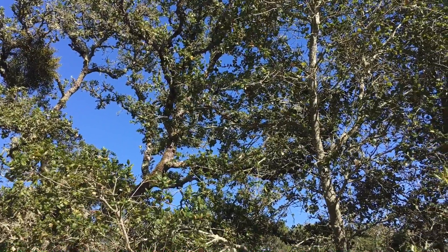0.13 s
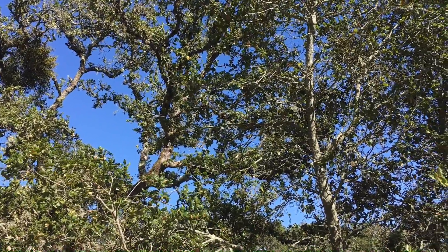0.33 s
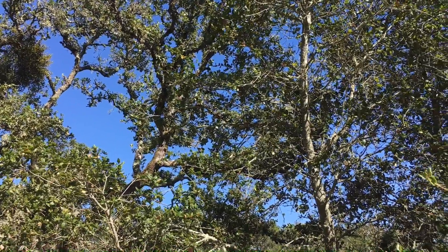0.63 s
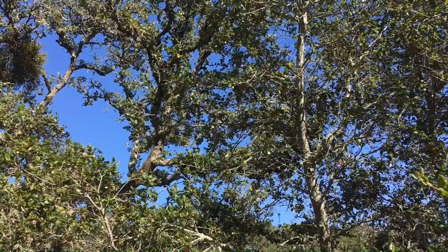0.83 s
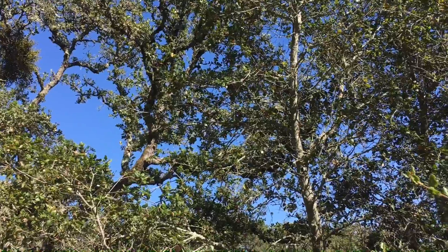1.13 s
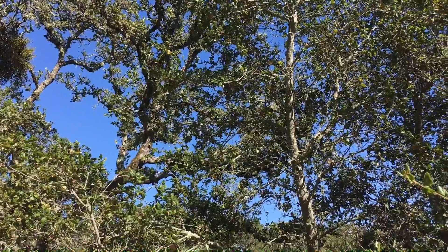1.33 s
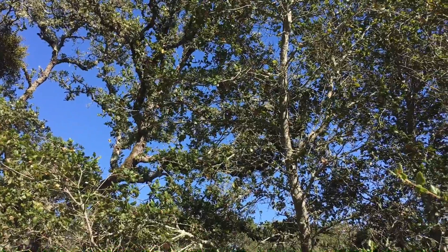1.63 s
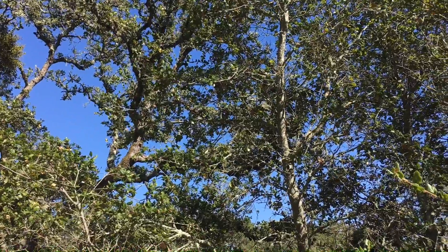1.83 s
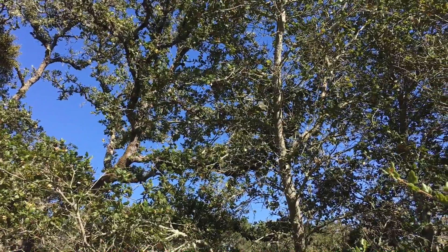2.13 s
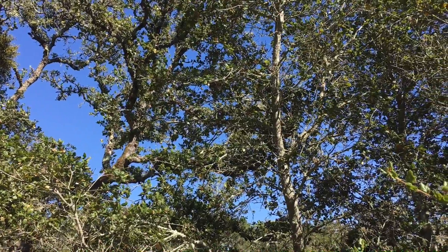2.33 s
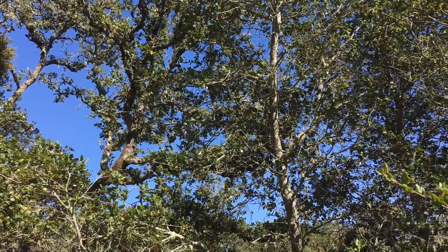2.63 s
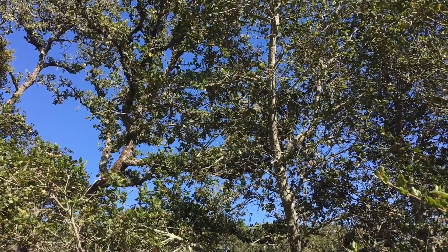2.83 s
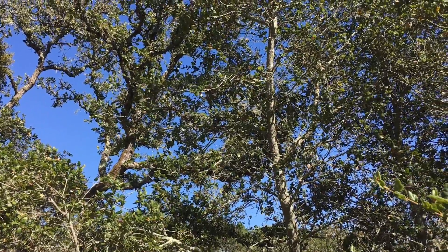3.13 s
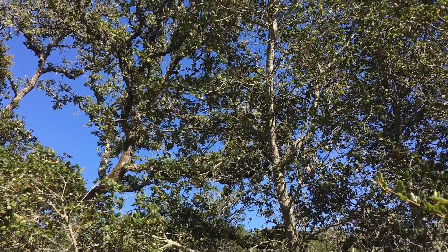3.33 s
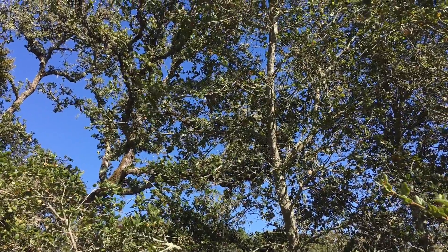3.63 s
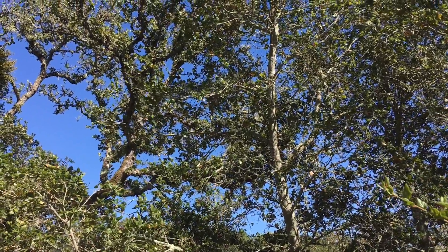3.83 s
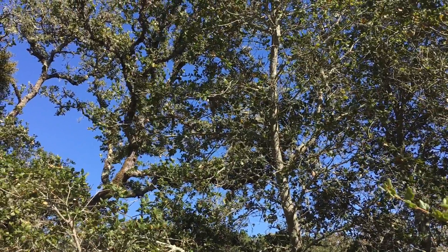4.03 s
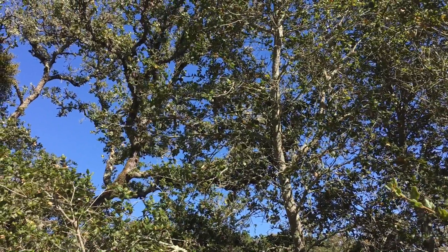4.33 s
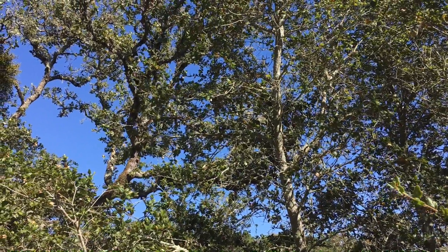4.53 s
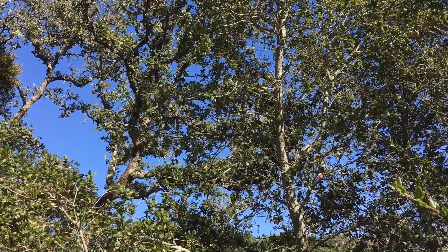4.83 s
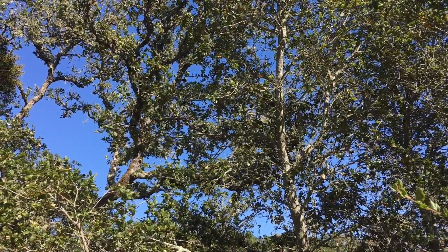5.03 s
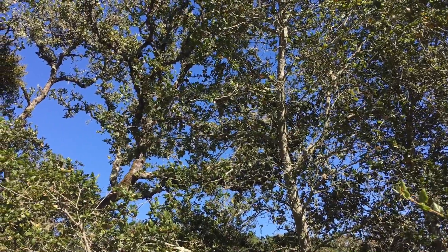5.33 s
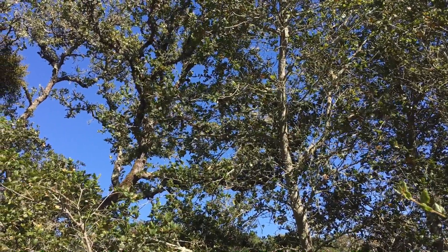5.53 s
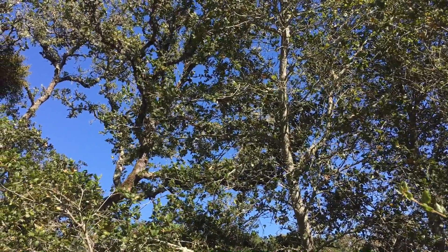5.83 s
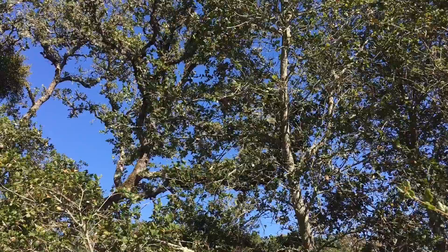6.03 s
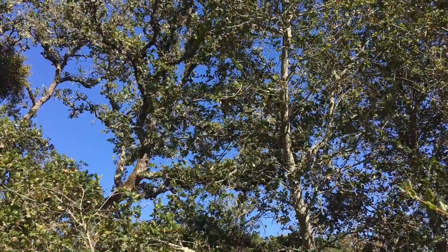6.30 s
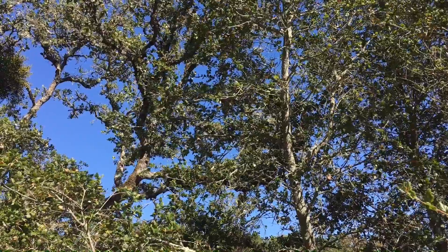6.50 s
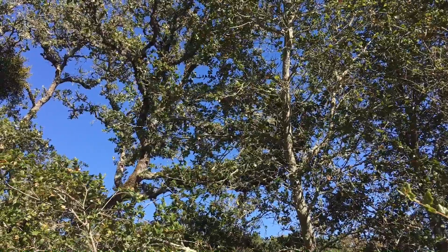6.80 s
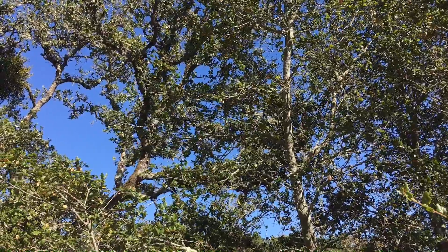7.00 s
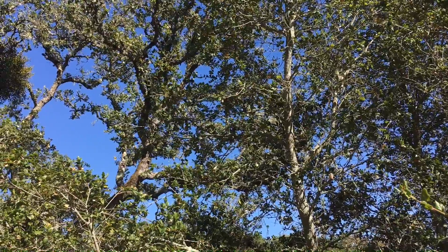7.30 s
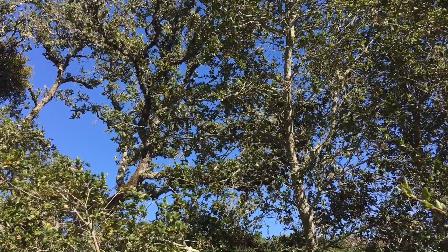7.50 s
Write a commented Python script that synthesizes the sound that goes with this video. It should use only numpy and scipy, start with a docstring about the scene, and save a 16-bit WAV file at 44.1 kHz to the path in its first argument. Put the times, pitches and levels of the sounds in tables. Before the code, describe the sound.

Small finches call softly from tall trees over a faint hiss and distant rumble. A chirp, a nasal note and a rising whine come first, then two plaintive falling whistles and a quick hoarse chatter. Another whine leads into a brief gust that thumps and rumbles on the microphone, and more falling whistles follow. Light wind puffs and a few dry leaf ticks come and go.

```python
"""Small finches call from tall trees: plaintive falling whistles, two-voiced rising whines, quick chatter.
Each note is a vibration of the syrinx, shaped by throat and beak, then scattered by trunks and leaves.
Puffs of wind and one strong gust buffet the microphone, dry leaves tick,
and a faint distant rumble lies under the hiss of the air."""
import sys
import numpy as np
from scipy import signal
from scipy.fft import rfft, irfft, next_fast_len
from scipy.io import wavfile
from scipy.ndimage import uniform_filter1d, map_coordinates

SR = 44100
rng = np.random.default_rng(int(sys.argv[2]) if len(sys.argv) > 2 else 0)


def output_pcm(signal):
    """Save a mono or channel-first signal as 16-bit PCM at the path in sys.argv[1].

    Samples are clipped to [-1, 1] before scaling.
    """
    pcm = np.clip(np.atleast_2d(signal).T, -1, 1) * 32767
    wavfile.write(sys.argv[1], SR, np.round(pcm).astype(np.int16))


N = 337790
T = np.arange(N) / SR

# A nearly pure voice at the syrinx. Each row: harmonic number, level in dB.
PURE_VOICE = [(1, 7.5), (2, -10), (3, -23.5), (4, -30)]
# Falling whistles. Each row: peak time in seconds, peak pitch in Hz, buzz length in seconds, valley
# pitch in Hz, lift length in seconds, crest pitch in Hz, tail length in seconds, tail start and end
# pitch in Hz, tail easing, peak, buzz and tail levels in dB, tail fade in dB, brightness in dB per octave.
FALLING_WHISTLES = [(2.576, 4990, .047, 3620, 0.041, 4000, .45, 3256, 2655, .45, -58, -54.3, -56, -17.5, 0),
                    (3.508, 5086, .064, 3800, .062, 3945, .14, 3860, 3296, 1.08, -54.5, -57, -56, -15, 9.5),
                    (5.802, 5110, .05, 3650, .038, 4060, .39, 3255, 2667, 0.122, -59, -55, -56.5, -12.5, -4),
                    (7.354, 4990, .072, 4060, 0.0083, 3980, .22, 3925, 3250, 0.5, -55.5, -52.5, -48.5, -16.5, 7.5)]


def whistles(lead_s=.04, lead_hz=802, lead_db=-14, warble_hz=463, shiver_hz=60, shiver_s=.068):
    """A soft lead-in climbs to a buzz, dips, lifts, then falls in a long tone that calms and turns reedy."""
    out = np.zeros(N)
    for (s, peak_hz, buzz_s, valley_hz, lift_s, crest_hz, tail_s, from_hz, to_hz, ease,
         peak_db, buzz_db, tail_db, fade_db, bright_db) in FALLING_WHISTLES:
        valley_s = s + buzz_s
        crest_s = valley_s + lift_s
        # breakpoints: time, pitch, level, warble depth
        lead = [(s - lead_s, peak_hz - lead_hz, peak_db + lead_db, 0),
                (s - .3 * lead_s, peak_hz - .202 * lead_hz, peak_db + .51 * lead_db, .3 * warble_hz)]
        buzz = [(s, peak_hz, peak_db, warble_hz),
                (s + .7 * buzz_s, valley_hz + .27 * (peak_hz - valley_hz), buzz_db, warble_hz),
                (valley_s, valley_hz, buzz_db - 10.5, .25 * warble_hz)]
        lift = [(valley_s + lift_s / 2, valley_hz + .3 * (crest_hz - valley_hz), tail_db - 7, 0),
                (crest_s - lift_s / 10, crest_hz, tail_db + 1.5, 0)]
        fall = glide(crest_s, tail_s, from_hz, to_hz, tail_db, ease, attack_s=.0013, release_s=.051,
                     fade_db=fade_db, scoop_hz=crest_hz - from_hz, bend_s=.014)
        tail = [(when, hz, db, shiver_hz * np.exp((crest_s - when) / shiver_s))
                for when, hz, db in fall[1:]]
        course = lead + buzz + lift + tail
        out += notes([course], PURE_VOICE, jitter=.0017, clean_db=-15, ripe=.78, bright_db=bright_db)
    return out


# The two sides of the syrinx in a whine. Each row: harmonic number, level in dB.
LOWER_VOICE = [(1, -3), (2, 2.5), (3, -8), (4, -12)]
UPPER_VOICE = [(1, 1.5), (2, -4), (3, -19)]
# Rising whines. Each row: start and length in seconds, lower voice start and end in Hz,
# upper voice start and end in Hz, level in dB.
RISING_WHINES = [(-.36, .51, 2013, 2725, 2950, 3590, -65.5), (1.42, .495, 2003, 2690, 2898, 3507, -60.5),
                 (5.285, .47, 2048, 2682, 2935, 3543, -60)]


def whines(sum_db=-9, cross_db=-12, closing_db=-9, upper_db=-9):
    """Both sides of the syrinx rise, the lower fading as the upper swells; coupling adds extra tones."""
    out = np.zeros(N)
    for s, length, low_from_hz, low_to_hz, up_from_hz, up_to_hz, db in RISING_WHINES:
        lower = glide(s, length, low_from_hz, low_to_hz, db, ease=-.05, attack_s=.065, release_s=.12,
                      fade_db=-6.5, scoop_hz=-350, bend_s=.013)
        upper = glide(s, length, up_from_hz, up_to_hz, db + upper_db, ease=.58, attack_s=.007,
                      release_s=.16, fade_db=10.5, scoop_hz=-220, bend_s=.0139)
        t = span(lower, upper)
        low_phase, low_hz, low_gain = syrinx(t, lower, jitter=.003)
        up_phase, up_hz, up_gain = syrinx(t, upper, jitter=.0017)
        dull_db = closing_db * np.linspace(0, 1, len(t)) ** 2  # the upper voice ends purer
        low_voice = beak(low_phase, low_hz, low_gain, LOWER_VOICE)
        up_voice = beak(up_phase, up_hz, up_gain, UPPER_VOICE, dull_db)
        sum_gain = undb(sum_db + dull_db) * response(BEAK_RESONANCE, low_hz + up_hz)
        sum_tone = sum_gain * np.sqrt(low_gain * up_gain) * np.sin(low_phase + up_phase)
        cross_tone = undb(cross_db) * up_gain * np.sin(2 * up_phase - low_phase)
        add(out, t, low_voice + up_voice + np.sqrt(2) * (sum_tone + cross_tone))
    return out


# The chatter. Each row: syllable time in seconds, pitch ratio, level in dB.
SYLLABLES = [(4.318, 1.03, -56.5), (4.421, 1.01, -56), (4.523, .99, -57.5), (4.624, 0.99, -58)]
# The three strokes of a syllable. Each row: offset and length in seconds, start and end pitch in Hz
# before the ratio, relative level in dB, easing, fade in dB.
SYLLABLE_STROKES = [(-.013, .032, 4610, 5500, -2, -1.17, -1), (-.002, 0.0476, 3550, 4220, -4.5, 1.3, 0),
                    (.017, .058, 3700, 2422, 3, .15, -14)]


def chatter():
    """Each syllable is a hoarse high flick, a middle flick and a downward slur that trails off low."""
    strokes = []
    for lag, length, from_hz, to_hz, stroke_db, ease, fade_db in SYLLABLE_STROKES:
        strokes.append([glide(s + lag, length, ratio * from_hz, ratio * to_hz, db + stroke_db, ease,
                              attack_s=.011, release_s=.016, fade_db=fade_db)
                        for s, ratio, db in SYLLABLES])
    high, middle, slur = strokes
    flick = rasp(notes(high, PURE_VOICE[:1], jitter=.022), rasp_db=-1, width_hz=1900)
    body = notes(middle + slur, PURE_VOICE, jitter=.01, bright_db=-3.5)
    return undb(-2.5) * flick + rasp(body, rasp_db=-6.5, width_hz=2300)


# Squeaks around the chatter and at the onset of whines.
# Each row: start and length in seconds, start and end pitch in Hz, level in dB.
SQUEAK_GLIDES = [(1.417, 0.035, 6050, 7200, -59), (1.437, 0.041, 4800, 5200, -58),
                 (5.285, 0.031, 6100, 6950, -59), (5.30, 0.036, 4800, 5200, -62),
                 (4.236, 0.078, 5830, 5990, -59.5), (4.257, 0.041, 5230, 5030, -59),
                 (4.236, 0.048, 2950, 3000, -65), (4.508, 0.028, 4680, 4400, -59)]


def squeaks(edge_db=-9):
    """Brief unsteady glides, loudest in the middle; those that climb steeply are the hoarsest."""
    steep, flat = [], []
    for s, length, from_hz, to_hz, db in SQUEAK_GLIDES:
        group = steep if to_hz > 1.06 * from_hz else flat
        group.append([(s, from_hz, db + edge_db),
                      (s + length / 2, (from_hz + to_hz) / 2, db),
                      (s + length, to_hz, db + edge_db)])
    hoarse = rasp(notes(steep, PURE_VOICE[:1], jitter=.0076), rasp_db=-1, width_hz=2500)
    clear = rasp(notes(flat, PURE_VOICE[:1], jitter=.0096), rasp_db=-10, width_hz=970)
    return hoarse + clear


# One down-slurred chirp: start and length in seconds, glide start and end in Hz, level in dB.
CHIRP_GLIDE = (0.84, 0.0861, 3560, 2978, -54.5)


def chirp():
    """A short, slightly hoarse note that drops from high up, levels out and falls away."""
    course = glide(*CHIRP_GLIDE, ease=.2, attack_s=.0067, release_s=.043, fade_db=-7.5,
                   scoop_hz=950, droop_hz=-650, bend_s=.00805)
    tone = notes([course], PURE_VOICE, jitter=.012, clean_db=-17.5, ripe=.74)
    return rasp(tone, rasp_db=-8, width_hz=600)


# A nasal voice at the syrinx. Each row: harmonic number, level in dB.
NASAL_VOICE = [(1, -4), (2, 3), (3, 3.5), (4, -2), (5, -8.5), (6, -9), (7, -8)]
# Its one note: start and length in seconds, start and end pitch in Hz, level in dB.
NASAL_GLIDE = (0.95, .5, 2130, 1737.5, -65.5)


def nasal_note():
    """One voice rich in overtones sags slowly in pitch as it grows louder."""
    course = glide(*NASAL_GLIDE, ease=.05, attack_s=.05, release_s=.15, fade_db=9)
    return notes([course], NASAL_VOICE, jitter=.001, clean_db=-7.5, ripe=.32)


def glide(start, length, from_hz, to_hz, db, ease, attack_s, release_s,
          fade_db=0, scoop_hz=0, droop_hz=0, bend_s=.015, edge_db=-16, waver_db=2, waver_rate_hz=26.1):
    """The course of a wavering note as (seconds, Hz, dB) rows; positive ease moves the pitch early."""
    progress = np.linspace(0, 1, 200)
    age, left = progress * length, (1 - progress) * length
    hz = from_hz + (to_hz - from_hz) * (progress + ease * progress * (1 - progress))
    hz = hz + scoop_hz * np.exp(-age / bend_s) + droop_hz * np.exp(-left / bend_s)
    edges = np.maximum(1 - age / attack_s, 0) ** 2 + np.maximum(1 - left / release_s, 0) ** 2
    level = db + fade_db * progress ** 1.4 + edge_db * edges
    level += waver_db * np.minimum(age * waver_rate_hz / 2, 1) * wander(age, waver_rate_hz)
    hz *= 1 + .0018 * wander(age, waver_rate_hz)
    return np.column_stack([start + age, hz, level])


def notes(courses, harmonics, jitter, clean_db=0, ripe=.6, bright_db=0):
    """One side of the syrinx sings; clean_db holds overtones back until the share ripe of each note."""
    out = np.zeros(N)
    for course in courses:
        t = span(course)
        young = np.clip(3 * (1 - np.linspace(0, 1, len(t)) / ripe), 0, 1)
        add(out, t, beak(*syrinx(t, course, jitter), harmonics, bright_db + clean_db * young))
    return out


def syrinx(t, course, jitter, warble_rate_hz=165, fade_s=.003, shimmer_db=1.3):
    """Phase, pitch and gain of one vibrating side of the syrinx; a fast, uneven warble makes it buzz."""
    s, *columns = np.transpose(course)
    hz, db, *depth = (uniform_filter1d(np.interp(t, s, column), size=200) for column in columns)
    hz = hz * (1 + jitter * wander(t, 248.8))
    db = db + shimmer_db * wander(t, 60.2)
    if depth:  # an optional fourth column: warble depth in Hz
        rate_hz = warble_rate_hz * (1 + .297 * wander(t, 150))
        hz = hz + depth[0] * np.sin(2 * np.pi * np.cumsum(rate_hz) / SR)
        db = db + 25 * depth[0] / hz * wander(t, 302)  # a deep warble also shakes the level
    gate = np.clip(np.minimum(t - s[0], s[-1] - t) / fade_s + .5, 0, 1)
    phase = 2 * np.pi * np.cumsum(hz) / SR
    return phase, hz, undb(db) * np.sin(gate * np.pi / 2) ** 2


# The resonance of throat and open beak. Each row: frequency in Hz, gain in dB.
BEAK_RESONANCE = [(1800, -15.5), (2600, -6), (3300, -9), (4400, 1), (5600, -1), (6400, -6.5), (7200, -14),
                  (10000, -8.5), (14000, -21)]


def beak(phase, hz, gain, harmonics, tilt_db=0):
    """Harmonics swell and fade as they glide through the resonance of the beak."""
    weights = [undb(db + tilt_db * np.log2(k)) * response(BEAK_RESONANCE, k * hz) * (k * hz < SR / 2)
               for k, db in harmonics]
    tone = sum(weight * np.sin(k * phase) for k, weight in enumerate(weights, 1))
    return gain * tone * np.sqrt(2 / sum(weight ** 2 for weight in weights))


def rasp(tone, rasp_db, width_hz):
    """Irregular flutter of the membranes spreads a tone into a band around it."""
    flutter = noise([(width_hz / 2, 0), (width_hz, -4), (2 * width_hz, -20), (4 * width_hz, -50)])
    gaping_beak = [(1.25 * hz, db) for hz, db in BEAK_RESONANCE]  # it opens wide on harsh notes
    return tone + undb(rasp_db) * colour(tone * flutter, gaping_beak)


def trees(calls, trunks_db, leaves_db, t60_s, count=14):
    """A few early echoes off trunks and branches, then a soft tail scattered by the leaves."""
    t = T[:SR]
    tail = rng.standard_normal(SR) * undb(-60 * t / t60_s) * (1 - np.exp(-t / .0087))
    reach, polarity = rng.random((count, 2)).T
    lags = .003 + .09 * reach ** 2
    early = np.zeros(SR)
    early[(lags * SR).astype(int)] = np.sign(polarity - .5) * np.exp(-lags / .068)
    echo = undb(trunks_db) * early / np.linalg.norm(early) + undb(leaves_db) * tail / np.linalg.norm(tail)
    return calls + signal.fftconvolve(calls, echo)[:N]


# The envelope of the one strong gust. Each row: time in seconds, level in dB.
GUST_ENVELOPE = [(5.4, -57), (5.562, -35), (5.636, -49), (5.668, -30), (5.702, -38.5), (5.806, -35.5),
                 (5.896, -59), (5.974, -28.5), (6.024, -38.5), (6.074, -37.5), (6.124, -79), (6.15, -75)]
# Light puffs. Each row: start and hold in seconds, level in dB.
LIGHT_PUFFS = [(0.056, .03, -49.5), (0.205, 0.23, -45.5), (0.703, 0.028, -46), (0.943, 0.2, -46),
               (1.467, 0.036, -48), (2.602, 0.035, -45.5), (3.36, 0.045, -51.5), (3.563, 0.025, -42.5),
               (4.738, 0.027, -51), (5.312, 0.091, -51), (6.39, 0.051, -45)]


def wind_level(breeze_db=-60, swing_db=3.6, rise_db_per_s=330, fall_db_per_s=230):
    """The wind's envelope in dB: a wavering breeze, one gust, and puffs that rise, hold and fall."""
    breeze = breeze_db + swing_db * wander(T, 10)
    gust = np.interp(T, *np.transpose(GUST_ENVELOPE), left=-np.inf, right=-np.inf)
    db = np.maximum(breeze, gust)
    for s, hold, top_db in LIGHT_PUFFS:
        before, after = np.maximum(s - T, 0), np.maximum(T - s - hold, 0)
        db = np.maximum(db, top_db - rise_db_per_s * before - fall_db_per_s * after)
    return db


# The EQ of the deep flow and of the smaller swirls it sheds. Each row: frequency in Hz, gain in dB.
FLOW_EQ = [(20, -45), (35, -6), (56, 0), (100, -11), (140, -20), (230, -40.5), (400, -54), (2000, -100)]
SWIRL_EQ = [(60, -14), (130, 1), (210, -1.5), (300, -10), (420, -21), (700, -52), (2000, -92)]


def wind(trim_db=-3, calm_db=-59):
    """Turbulence rumbles on the microphone as puffs rise above calm; strong ones shed higher swirls."""
    db = wind_level()
    flow = noise(FLOW_EQ)
    flow /= np.sqrt(uniform_filter1d(flow ** 2, size=3000))  # even out the noise's own swells
    power = undb(2 * db)
    rumble = undb(trim_db) * flow * np.sqrt(np.maximum(power - undb(2 * calm_db), power / 10))
    swirl_db = -43.5 + 2.21 * np.minimum(db + 32.5, 0)  # swirls grow faster than the flow, up to a cap
    return rumble + undb(swirl_db) * noise(SWIRL_EQ)


# Wind thumps. Each row: start in seconds, pitch in Hz, level in dB before the trim, width in seconds.
EDDY_THUMPS = [(1.36, 211, -54, 0.035), (3.80, 205, -52.5, .042), (5.52, 60, -28, 0.012),
               (5.561, 96, -27, 0.0097), (5.573, 189, -30.5, 0.0079), (5.659, 320, -39, 0.0049),
               (5.795, 94, -26.5, 0.0096), (5.935, 105, -29.5, 0.0077), (5.966, 201, -20, 0.0086),
               (5.968, 430, -35, 0.0052), (5.975, 60.4, -19.5, 0.012), (6.031, 130, -29, 0.0065),
               (6.056, 58, -29, .016)]


def eddies(trim_db=-2):
    """Single eddies strike the microphone, each a low tone that swells and dies at once."""
    out, t = np.zeros(N), T[:SR // 8]
    for s, hz, db, width_s in EDDY_THUMPS:
        age = 2 * t / width_s
        swell = (age * np.exp(1 - age)) ** 2
        add(out, s + t, undb(db + trim_db) * swell * np.sin(2 * np.pi * hz * t))
    return out


# The clearest ticks of leaves and twigs. Each row: start in seconds, level in dB, decay in seconds.
LEAF_TICKS = [(.246, -55.5, 0.015), (.357, -65, .006), (.379, -65, .01), (.668, -59, .0045),
              (.839, -64, .008), (.872, -62, .004), (1.672, -58, .008), (2.827, -54, .003),
              (3.841, -56.5, 0.0062)]
# Spells of rustle. Each row: start and end in seconds, top level of a tick in dB.
LEAF_RUSTLES = [(.08, 0.457, -67), (0.798, 0.901, -71.5), (3.801, 4.077, -69.5)]
# The crisp EQ of both. Each row: frequency in Hz, gain in dB.
LEAF_EQ = [(700, -1.5), (2500, 5), (4500, 7.5), (8000, 4.5), (10500, 1), (12500, 4), (16000, -1)]


def leaves(ticks_per_rustle=40):
    """Dry leaves and twigs tick; each rustle is a random scatter of smaller ticks."""
    envelope, t = np.zeros(N), T[:SR // 10]
    for s, db, decay in LEAF_TICKS:
        add(envelope, s + t, undb(db) * np.exp(-t / decay))
    for start, end, db in LEAF_RUSTLES:
        for when, size in rng.random((ticks_per_rustle, 2)):
            add(envelope, start + when * (end - start) + t, undb(db) * size ** 2 * np.exp(-t / .01))
    return uniform_filter1d(envelope, size=130) * noise(LEAF_EQ)


# Thin, very high ticks. Each row: peak time in seconds, level in dB.
HIGH_CHIPS = [(.843, -62), (1.069, -66), (1.755, -63.5), (2.07, -70), (2.781, -66), (2.829, -61),
              (3.92, -70), (3.955, -67), (4.767, -64.5), (5.978, -66), (6.703, -67), (7.182, -65.5)]
# Their EQ. Each row: frequency in Hz, gain in dB.
CHIP_EQ = [(6000, -18), (9500, -8), (11800, -2), (13200, -8), (15500, -11)]


def chips(slope_s=.011):
    """Tiny dry ticks at the top of hearing, each rising as fast as it falls."""
    envelope, t = np.zeros(N), T[:SR // 10] - .05
    for s, db in HIGH_CHIPS:
        add(envelope, s + t, undb(db) * np.exp(-abs(t) / slope_s))
    return envelope * noise(CHIP_EQ)


# The EQ of the air's hiss and of the distant rumble. Each row: frequency in Hz, gain in dB.
AIR_EQ = [(180, -41), (300, -3.5), (366, -2), (477, -7.5), (554, -5), (601, -7.5), (653, -7), (1680, -12.5),
          (1850, -14), (3200, -12), (4850, -16.5), (5910, -16), (10600, -18), (14700, -11.5), (15700, -15)]
RUMBLE_EQ = [(20, -21), (55, 0.5), (110, -0.5), (190, -6), (270, -13.5), (400, -21.5), (800, -43.5),
             (2000, -78)]


def background(air_db=-66.82, band_db=-82, rumble_db=-61):
    """A bed of even hiss with a thin high band in it, over a gently breathing far-off rumble."""
    hiss = undb(air_db + .041 * wander(T, 3)) * noise(AIR_EQ)
    high_band = undb(band_db) * noise([(14000, -50), (14500, -2), (15000, -49)])
    rumble = undb(rumble_db + .8 * wander(T, 4)) * noise(RUMBLE_EQ)
    return hiss + high_band + rumble


def undb(db):
    """Decibels to gain."""
    return 10 ** (np.asarray(db) / 20)


def response(eq, hz):
    """Gain of a (Hz, dB) curve at the given frequencies."""
    eq_hz, db = np.transpose(eq)
    return undb(np.interp(np.log(hz + 1), np.log(eq_hz), db))


def colour(sound, eq):
    """Filter a sound with a (Hz, dB) curve."""
    size = next_fast_len(N, True)
    return irfft(rfft(sound, size) * response(eq, np.fft.rfftfreq(size, 1 / SR)), size)[:N]


def noise(eq):
    """Noise shaped by an EQ curve, rms 1."""
    shaped = colour(rng.standard_normal(N), eq)
    return shaped / np.sqrt(np.mean(shaped ** 2))


def wander(t, rate_hz):
    """Smooth random drift over the times t, spread near 1."""
    return map_coordinates(rng.standard_normal(4096), [(t - t[0]) * rate_hz], order=2, mode="wrap")


def add(out, t, sound):
    """Mix a sound in at its times."""
    start = int(round(t[0] * SR))
    part = sound[:max(N - start, 0)]
    out[start:start + len(part)] += part


def span(*courses):
    """Sample times that cover the courses, with room to fade."""
    s = np.concatenate([np.transpose(course)[0] for course in courses])
    return T[(T > s.min() - .01) & (T < s.max() + .01)]


def scene():
    """Finches echo in the trees over leaves, wind and the background bed, in mono."""
    whistling = trees(whistles() + chirp(), trunks_db=-4, leaves_db=-6, t60_s=.46)
    reedy_calls = nasal_note() + rasp(whines(), rasp_db=-13, width_hz=330) + squeaks()
    whining = trees(reedy_calls, trunks_db=-4, leaves_db=-7, t60_s=.6)
    chattering = trees(chatter(), trunks_db=-4.5, leaves_db=-6, t60_s=.42)
    finches = whistling + whining + chattering
    return (finches + chips() + leaves() + wind() + eddies() + background())[None]


def record(dry, low_cut_hz=27.3, high_cut_hz=15800):
    """A low cut drops the deepest bass and a steep high cut takes off the very top."""
    low_cut = signal.butter(3, low_cut_hz, "high", fs=SR, output="sos")
    high_cut = signal.ellip(10, .05, 60, high_cut_hz, fs=SR, output="sos")
    return signal.sosfiltfilt(high_cut, signal.sosfiltfilt(low_cut, dry))


dry = scene()
out = record(dry)
output_pcm(out)
```